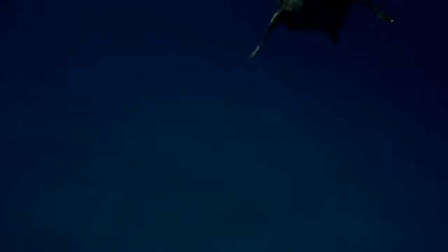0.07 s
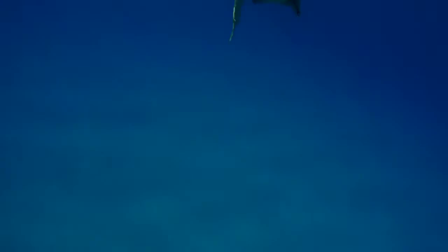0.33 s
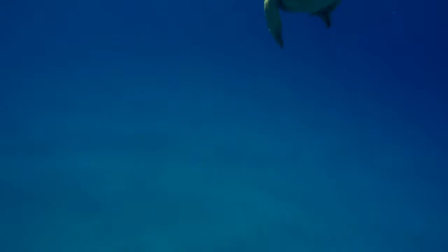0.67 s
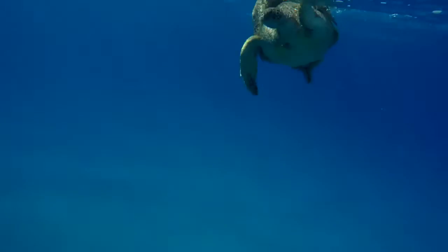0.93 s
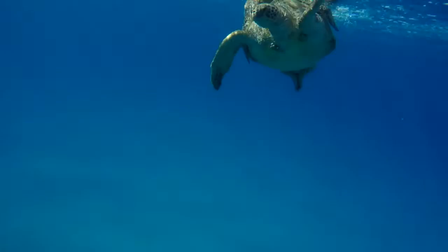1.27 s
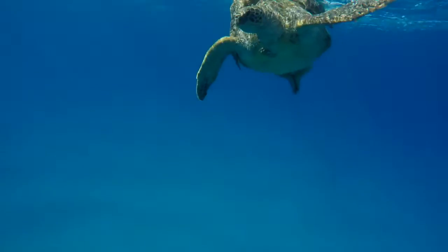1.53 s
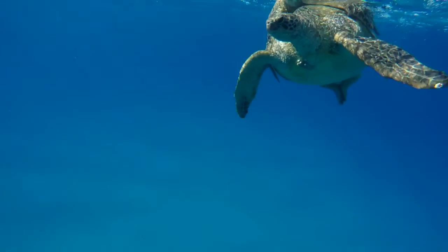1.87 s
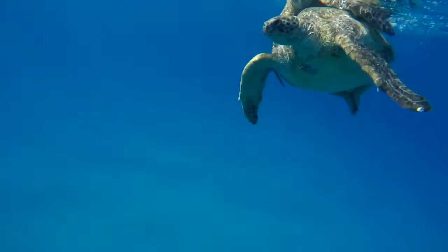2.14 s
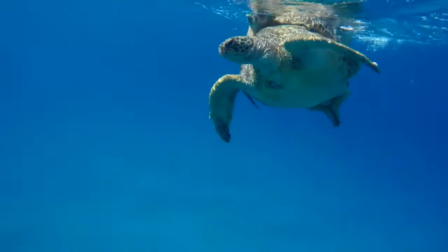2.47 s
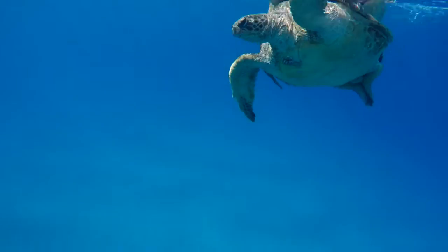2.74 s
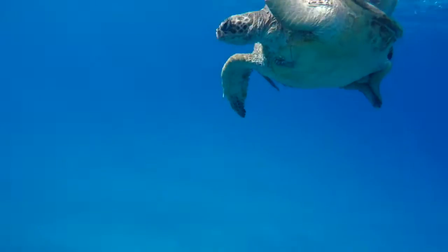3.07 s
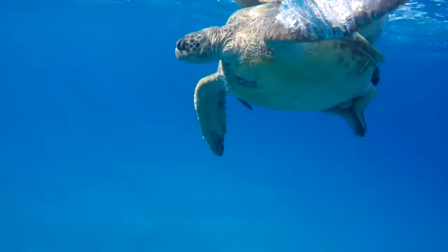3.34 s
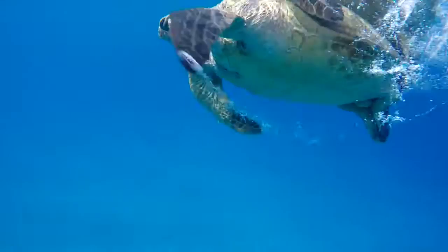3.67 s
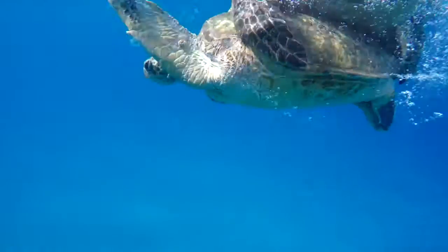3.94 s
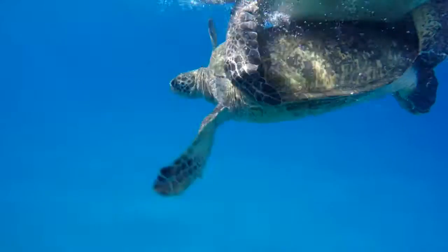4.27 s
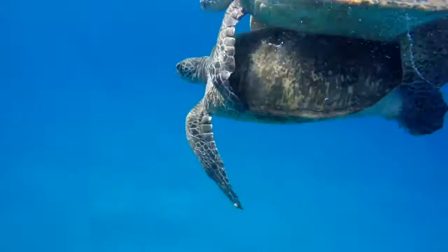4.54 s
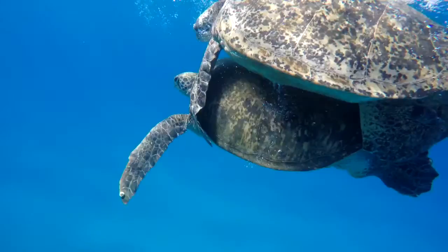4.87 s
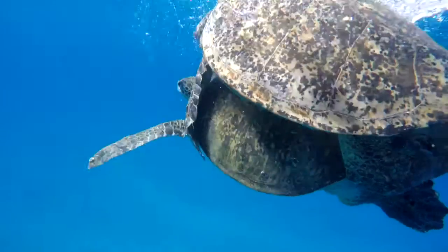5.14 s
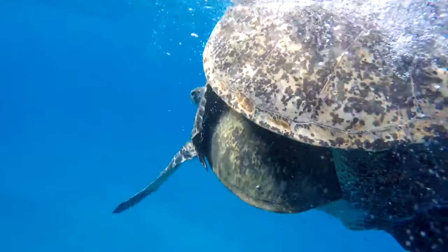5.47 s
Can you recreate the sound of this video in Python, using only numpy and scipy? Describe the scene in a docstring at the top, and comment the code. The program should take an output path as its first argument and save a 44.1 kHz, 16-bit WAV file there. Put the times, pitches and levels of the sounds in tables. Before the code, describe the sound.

A splash right at the microphone, then muffled underwater plops, knocks and low rumble, swelling into gurgling bubbles and thuds from swimming turtles' flippers.

```python
"""Gurgling, fizzing bubbles and water shoved by the flippers of two swimming sea turtles.
A waterproof camera housing splashes in beside them, knocks in the hand and sheds plopping air pockets.
Each bubble rings as a damped sine; each shove booms inside a puff of turbulence.
The bubble cloud is heard through the housing's resonances, over the slow rumble of flow around it."""
import sys
import numpy as np
from scipy import signal
from scipy.fft import rfft, irfft, next_fast_len
from scipy.io import wavfile

SR = 44100
rng = np.random.default_rng(int(sys.argv[2]) if len(sys.argv) > 2 else 0)


def log_audio(samples):
    """Write samples as a 16-bit WAV file to the path given in sys.argv[1]."""
    # one column per channel
    frames = np.atleast_2d(samples).T
    # limit to full scale, then quantise
    limited = np.clip(frames, -1, 1)
    pcm = np.round(limited * 32767).astype(np.int16)
    wavfile.write(sys.argv[1], SR, pcm)


N = 247842
TIME_S = np.arange(N) / SR

# shoves of water, by the dipping case, then by flippers: start_s, level_db, boom_hz, t60_s
WATER_SHOVES = [(0.13, -13, 102.3, 0.047), (0.226, -13.5, 65.4, 0.024), (0.902, -29.5, 155.6, 0.075),
                (2.636, -28, 120.8, 0.18), (2.79, -29.5, 94.8, 0.27), (3.239, -34, 115, .08),
                (3.487, -14.5, 66, 0.057), (4.085, -25, 65, 0.18), (4.219, -26, 67.3, 0.075),
                (4.316, -23.5, 66, 0.31), (4.492, -28, 114.8, 0.21), (5.333, -42, 67.6, 0.1)]


def from_db(db):
    """Decibels to gain."""
    return 10 ** (np.asarray(db) / 20)


def unit_rms(x):
    """Scale to rms 1."""
    return x / np.sqrt(np.mean(x ** 2) + 1e-20)


def curves(rows):
    """One curve per column, interpolated over the times in the first."""
    times_s, *columns = np.transpose(rows)
    return [np.interp(TIME_S, times_s, column) for column in columns]


def band(x, low_hz, high_hz, order=2):
    """Causal band-pass."""
    edges_hz = [low_hz, min(high_hz, .45 * SR)]
    return signal.sosfilt(signal.butter(order, edges_hz, "band", fs=SR, output="sos"), x)


def noise(spectrum):
    """Steady coloured noise, rms 1."""
    hz, db = np.transpose(spectrum)
    size = next_fast_len(N)
    log_hz = np.log(np.fft.rfftfreq(size, 1 / SR) + 1)
    gain = from_db(np.interp(log_hz, np.log(hz), db))
    return unit_rms(irfft(rfft(rng.standard_normal(size)) * gain, size)[:N])


def drift(rate_hz):
    """Random wander, rms 1."""
    return unit_rms(np.interp(TIME_S * rate_hz, np.arange(1000), rng.standard_normal(1000)))


def add(out, start_s, sound):
    """Mix a sound in at start_s."""
    i = max(int(start_s * SR), 0)
    out[i:i + len(sound)] += sound[:max(N - i, 0)]


def swell(t60_s, rise):
    """Time axis and attack-decay envelope, peak 1; rise is a share of t60_s."""
    t60_s = np.clip(t60_s, .002, .45)
    t = np.arange(int(2 * t60_s * SR)) / SR
    envelope = (1 - np.exp(-t / (rise * t60_s))) * np.exp(-np.log(1000) * t / t60_s)
    return t, envelope / envelope.max()


def ring(hz, t60_s, rise, glide=0):
    """Damped sine of a bubble or case mode; pitch climbs by the share glide per t60_s."""
    t, envelope = swell(t60_s, rise)
    return envelope * np.sin(2 * np.pi * hz * t * (1 + .5 * glide * t / t60_s))


def burst(hz, t60_s, spread, rise):
    """Decaying noise puff centred on hz, peak 1."""
    t, envelope = swell(t60_s, rise)
    white = rng.standard_normal(SR)[:len(t)]
    puff = band(envelope * white, hz / (1 + spread), hz * (1 + spread))
    return puff / np.abs(puff).max()


def cloud(low_hz, high_hz, cycles, spread_db, glide, count):
    """Bubbles born at random, many faint, a few loud; rms 1."""
    out = np.zeros(N)
    for when, pitch, strength, length in rng.random((count, 4)):
        hz = low_hz * (high_hz / low_hz) ** pitch
        gain = from_db(spread_db * min(-np.log(1 - strength), 4))
        t60_s = cycles * (.5 + length) / hz
        add(out, when * N / SR, gain * ring(hz, t60_s, rise=.025, glide=glide))
    return unit_rms(out)


def housing(x, leak_db):
    """The case passes its resonances and leaks a little between them."""
    # housing resonances: centre_hz, width_hz, gain_db
    resonances = [(524.4, 96, 0.5), (747, 37, -10.5), (995, 140, -14), (1302, 53, -19), (1648, 120, -7),
                  (2256, 107, -10.5), (2670, 200, -28.5), (3620, 290, -16.5), (5000, 540, -17.5),
                  (6800, 290, -14), (9430, 550, -16.5), (12690, 6100, -40)]
    out = from_db(leak_db) * x
    for centre_hz, width_hz, gain_db in resonances:
        radius = np.exp(-np.pi * width_hz / SR)
        scale = (1 - radius ** 2) / 2
        feedback = [1, -2 * radius * np.cos(2 * np.pi * centre_hz / SR), radius ** 2]
        out += from_db(gain_db) * signal.lfilter([scale, 0, -scale], feedback, x)
    return out


def through_wall(x):
    """The thick wall muffles close sounds; scatter off the surface leaves the case ringing."""
    muffled = band(x, low_hz=60, high_hz=3400, order=6)
    t, envelope = swell(t60_s=.1, rise=.044)
    scatter = envelope * rng.standard_normal(SR)[:len(t)]
    tail = signal.fftconvolve(muffled, scatter / np.linalg.norm(scatter))[:N]
    return muffled + from_db(-16) * housing(tail, leak_db=-17)


def plops():
    """Air pockets tear loose with a short splutter and ring at two pitches."""
    # air pockets: start_s, low_hz, low_db, high_hz, high_db, high_cycles
    pockets = [(0.0905, 1720, -23, 3040, -10.5, 4.7), (0.1036, 570, -21, 2020, -11.5, 22),
               (0.116, 1140, -12, 1800, -9.5, 12), (0.1222, 593, -8.5, 1760, -2, 15),
               (0.1266, 518, -7, 2720, -6, 21), (0.1298, 565, -11, 1190, -4.5, 4.7),
               (0.138, 546.6, -11.5, 1082, -15, 18), (0.1456, 565, -23.5, 1070, -12, 17),
               (0.1791, 564, -16, 1034, -5, 6.3), (0.2885, 716, -40.5, 1970, -36.5, 13),
               (0.391, 475, -17, 1558, -15.5, 29), (0.437, 450, -24, 1200, -13, 4.9),
               (0.4653, 479, -9.5, 1430, -12.5, 34.6), (0.5304, 482, -14.5, 1055, -17, 28.6),
               (0.6786, 590, -29, 1930, -28, 18), (0.724, 622, -27, 2220, -17, 23),
               (0.7736, 770, -29.5, 1800, -19.5, 30), (0.7899, 880, -38, 1640, -16.5, 7.3),
               (0.93, 404, -44.5, 2310, -33, 36), (1.428, 593, -40, 1600, -38, 26),
               (1.628, 535, -48, 2490, -40.5, 52), (2.636, 190.5, -33, 447, -26, 12),
               (3.238, 189, -38, 456, -32, 7.4), (3.487, 291.6, -11, 529, -8.5, 28),
               (4.267, 500, -35, 1670, -30, 29), (4.305, 565, -29.5, 2610, -27, 64),
               (4.587, 1160, -19.5, 1870, -19, 30), (4.8299, 930, -18, 2580, -10.5, 9.2),
               (4.8555, 956, -18, 2760, -11, 33)]
    low_cycles = 20.1
    out = np.zeros(N)
    for start_s, low_hz, low_db, high_hz, high_db, high_cycles in pockets:
        add(out, start_s, from_db(low_db) * ring(low_hz, low_cycles / low_hz, rise=.058))
        add(out, start_s, from_db(high_db) * ring(high_hz, high_cycles / high_hz, rise=.073))
        splutter = burst(.81 * high_hz, t60_s=.015, spread=.71, rise=.04)
        add(out, start_s, from_db(high_db - 1.5) * band(splutter, .56 * low_hz, 1.42 * high_hz))
    return out


def ticks():
    """Tiny air pockets snap on the case with a brief ping."""
    # snapping pockets: start_s, level_db, pitch_hz, t60_s
    snaps = [(0.0907, -12, 5830, 0.006), (0.099, -25.5, 6470, 0.026), (0.1222, -7, 3860, 0.0027),
             (0.136, -22, 5640, 0.015), (0.1439, -30, 6790, 0.01), (0.169, -38.5, 5500, 0.0048),
             (0.2043, -36, 4600, 0.0065), (0.2298, -39, 5540, 0.0086), (0.436, -6.5, 6560, 0.0013),
             (0.5384, -29.5, 5600, 0.0016), (0.7896, -19.5, 5320, 0.01), (4.0685, -39.5, 9600, 0.0061),
             (4.1648, -36, 9100, 0.0015), (4.293, -31.5, 3750, 0.017), (4.4963, -34.5, 4800, 0.0043),
             (4.539, -41, 12000, 0.0074), (4.8291, -31, 4030, 0.0058), (4.855, -38, 4270, 0.009),
             (5.4979, -47.5, 7500, 0.011)]
    out = np.zeros(N)
    for start_s, level_db, pitch_hz, t60_s in snaps:
        add(out, start_s, from_db(level_db - 3) * ring(pitch_hz, t60_s, rise=.053))
        add(out, start_s, from_db(level_db - 5.5) * burst(pitch_hz, t60_s, spread=.36, rise=.029))
    return out


def flow_rumble():
    """Flow around the case rumbles."""
    # flow strength: time_s, level_db
    flow = [(0.12, -21), (0.54, -35), (1.18, -25.5), (1.23, -33.5), (1.98, -35), (4.0, -33), (4.08, -29),
            (5.09, -31), (5.5, -26.5)]
    # rumble spectrum: freq_hz, density_db
    spectrum = [(6, -29.5), (12, 2), (22, -6.5), (33, 0), (50, -16), (75, -20.5), (130, -47.5), (250, -99)]
    return from_db(curves(flow)[0]) * noise(spectrum)


def churn(gurgle_db):
    """Turbulence builds to each shove and dies after it; the bubble cloud keeps the water stirred."""
    # turbulence spectrum: freq_hz, density_db
    spectrum = [(40, -28.5), (75, 10), (120, 4), (200, -3), (330, -8), (420, -18.5), (700, -45.5),
                (1500, -70)]
    calm_db, wake_db, rise_db_per_s, t60_ratio = -54.5, -14, 239.5, 6.7
    level_db = np.maximum(calm_db, gurgle_db - 6.5)
    for start_s, shove_db, _, t60_s in WATER_SHOVES:
        before_db = rise_db_per_s * (start_s - TIME_S)
        after_db = 60 * (TIME_S - start_s) / (t60_ratio * t60_s)
        level_db = np.maximum(level_db, shove_db + wake_db - np.maximum(before_db, after_db))
    return from_db(level_db + 2 * drift(rate_hz=27)) * noise(spectrum)


def bubbly_water():
    """In churning water large bubbles gurgle, small ones fizz, the finest hiss; far ones blur."""
    # bubble cloud strength: time_s, gurgle_db, fizz_db
    levels = [(0.3, -55.5, -65), (0.45, -56, -62.5), (0.8, -50.5, -58.5), (1.1, -58.5, -65),
              (1.68, -51, -61.5), (2.37, -59, -63), (2.86, -54.5, -61.5), (3.23, -57, -57.5),
              (3.49, -44.5, -54), (3.63, -39.5, -48.5), (4.08, -41, -58), (4.6, -46.5, -60.5),
              (5.22, -40.5, -58.5), (5.62, -42.5, -66)]
    gurgle_db, fizz_db = curves(levels)
    hiss_db = -71.5 + .54 * (fizz_db - fizz_db.mean())
    close_db = -43.5  # louder is closer: above this, single bubbles stand out
    nearness = from_db(.72 * (gurgle_db - close_db))
    wash_share = 1 / np.hypot(nearness, 1)
    grain_share = nearness * wash_share
    white = rng.standard_normal(N)

    def blend(grains, low_hz, high_hz):
        """Single bubbles and noise wash in one band, at constant power."""
        wash = unit_rms(band(white, low_hz, high_hz, order=4))
        return grain_share * unit_rms(band(grains, low_hz, high_hz, order=4)) + wash_share * wash

    large = cloud(301.1, 1047, cycles=19.5, spread_db=4.5, glide=.27, count=900)
    small = cloud(950, 3400, cycles=24, spread_db=5.5, glide=.05, count=2800)
    fine = cloud(4000, 12000, cycles=30, spread_db=-.5, glide=.03, count=1500)
    gurgle = unit_rms(housing(blend(large, 250, 931), leak_db=-30.5))
    fizz = unit_rms(housing(blend(small, 1200, 4200), leak_db=-35))
    hiss = unit_rms(housing(blend(fine, 3900, 20000), leak_db=-54.5))
    out = churn(gurgle_db)
    # close bubbles add to the wash and come in clumps
    out += from_db(gurgle_db - .13 + 3.7 * grain_share * drift(rate_hz=30)) * gurgle / wash_share
    out += from_db(fizz_db - 1.5 + 4 * grain_share * drift(rate_hz=60)) * fizz / wash_share
    return out + from_db(hiss_db) * hiss


def background():
    """Faint, steady broadband hiss."""
    # hiss spectrum: freq_hz, density_db
    spectrum = [(100, -9), (300, -13), (700, -5.5), (1200, -14.5), (3000, -18.5), (7500, -19.5),
                (11000, -26), (15000, -30)]
    return from_db(-65) * noise(spectrum)


def splash():
    """Water closes over the case with a crunch; the foam seethes and dies."""
    start_s = .1225
    crunch, foam = np.zeros(N), np.zeros(N)
    add(crunch, start_s, from_db(-3) * burst(hz=2180, t60_s=.044, spread=.4, rise=.016))
    add(foam, start_s, from_db(-17) * burst(hz=1330, t60_s=.26, spread=.7, rise=.06))
    return crunch + housing(foam, leak_db=-16)


def thumps():
    """At each shove a large air pocket booms inside a puff of turbulence."""
    out = np.zeros(N)
    for start_s, level_db, boom_hz, t60_s in WATER_SHOVES:
        add(out, start_s, from_db(level_db - .5) * ring(boom_hz, t60_s, rise=.029, glide=.033))
        add(out, start_s, from_db(level_db - 4.5) * burst(2.23 * boom_hz, t60_s, spread=.61, rise=.05))
    return out


def knocks():
    """Each bump of the hand rings the same case modes, with a faint scuff."""
    # bumps on the case: start_s, level_db
    bumps = [(0.1653, -23.5), (0.201, -13.5), (0.217, -7), (0.23, -4.5), (0.2464, -19.5), (0.532, -14.5),
             (0.938, -24.5), (1.385, -38), (2.561, -37)]
    # case modes: pitch_hz, mode_db, t60_s
    modes = [(556.5, 2, 0.03), (695, -9.5, 0.022)]
    out = np.zeros(N)
    for start_s, level_db in bumps:
        for pitch_hz, mode_db, t60_s in modes:
            add(out, start_s, from_db(level_db + mode_db) * ring(pitch_hz, t60_s, rise=.028))
        add(out, start_s, from_db(level_db - 15) * burst(hz=1300, t60_s=.034, spread=.5, rise=.06))
    return out


def swarms():
    """Small bubbles drift close past the case, pinging one by one; the finest snap."""
    # passing swarms: start_s, end_s, level_db
    passes = [(1.342, 1.773, -56), (3.565, 4.66, -53.5), (5.16, 5.434, -56.5)]
    fade_s = .026
    gain = np.zeros(N)
    for start_s, end_s, level_db in passes:
        inside_s = np.minimum(TIME_S - start_s, end_s - TIME_S)
        gain += from_db(level_db) * np.clip(inside_s / fade_s, 0, 1)
    pings = cloud(1000, 4580, cycles=50, spread_db=5.5, glide=.04, count=640)
    pings = unit_rms(band(pings, low_hz=983, high_hz=2500, order=1))
    snaps = cloud(2900, 7300, cycles=14, spread_db=0, glide=.032, count=340)
    return gain * (pings + from_db(-15) * snaps)


def crackles():
    """Bubble rafts break up in short runs of tiny collapses."""
    # breaking rafts: start_s, level_db, centre_hz
    rafts = [(3.475, -27, 1660), (3.486, -22.5, 1590), (3.6143, -29, 1550), (3.69, -30, 1690),
             (3.7743, -28, 1640), (3.9145, -36, 2600), (4.062, -26.5, 1780), (4.2037, -30, 1750),
             (4.467, -28, 2900)]
    collapses_per_s = 1800
    t, envelope = swell(t60_s=.071, rise=.05)
    out = np.zeros(N)
    for start_s, level_db, centre_hz in rafts:
        sizes = rng.standard_normal(SR)[:len(t)]
        collapses = rng.random(SR)[:len(t)] < collapses_per_s / SR
        crackle = band(envelope * sizes * collapses, centre_hz / 1.37, centre_hz * 1.24, order=1)
        add(out, start_s, from_db(level_db - 2.5) * crackle / (np.abs(crackle).max() + 1e-9))
    return band(out, low_hz=900, high_hz=7200)


def bloops():
    """Large free bubbles ring long at one pitch."""
    # free bubbles: start_s, pitch_hz, level_db
    bubbles = [(3.512, 284.6, -22.5), (3.539, 280, -25), (3.566, 285, -26.5), (3.592, 549, -18),
               (3.608, 1660, -28.5), (4.328, 966, -29), (4.767, 568, -29), (5.167, 1790, -29),
               (5.1985, 524, -26), (5.219, 1852, -35.5), (5.289, 545, -28), (5.362, 547.6, -16),
               (5.391, 530, -20), (5.382, 1890, -34.5), (5.418, 1706, -31)]
    cycles = 46
    out = np.zeros(N)
    for start_s, pitch_hz, level_db in bubbles:
        add(out, start_s, from_db(level_db) * ring(pitch_hz, cycles / pitch_hz, rise=.037))
    return out


def scene():
    """Mono mix; the water bed starts as the case goes under."""
    entry_s, fade_s = .0915, .00098
    submerged = np.clip((TIME_S - entry_s) / fade_s, 0, 1)
    bed = flow_rumble() + bubbly_water() + swarms() + background()
    close = through_wall(plops() + knocks() + bloops())
    return (submerged * bed + close + splash() + ticks() + thumps() + crackles())[None]


def record(dry):
    """Soft peak limiter, then a steep low-pass."""
    ceiling, cutoff_hz = .95, 15800
    limited = dry / (1 + np.abs(dry / ceiling) ** 6) ** (1 / 6)
    return signal.sosfilt(signal.ellip(10, .1, 80, cutoff_hz, fs=SR, output="sos"), limited)


dry = scene()
out = record(dry)
log_audio(out)
```